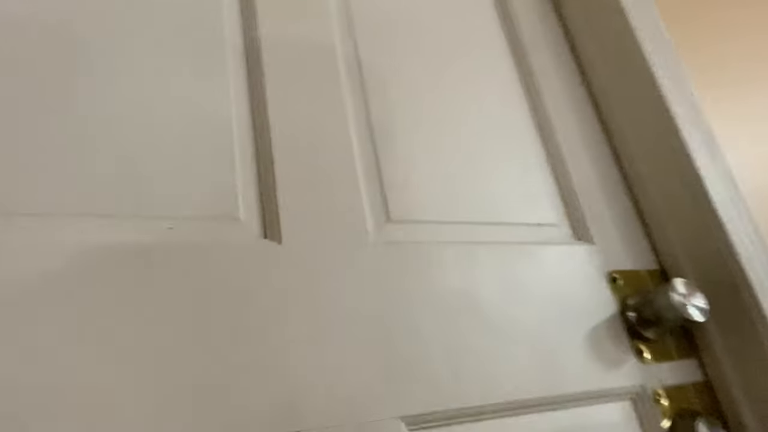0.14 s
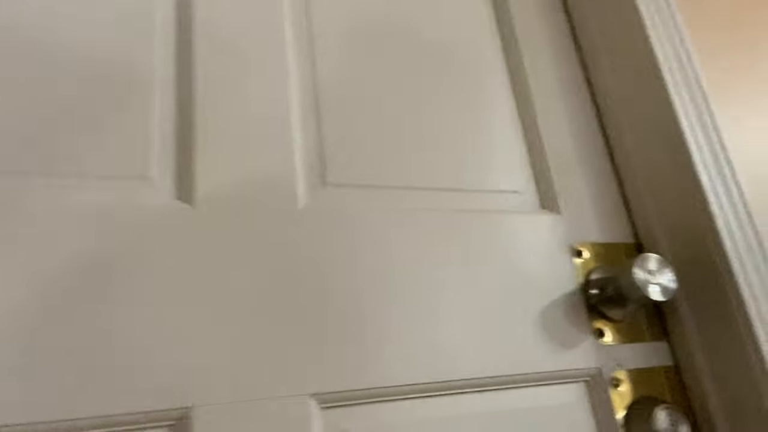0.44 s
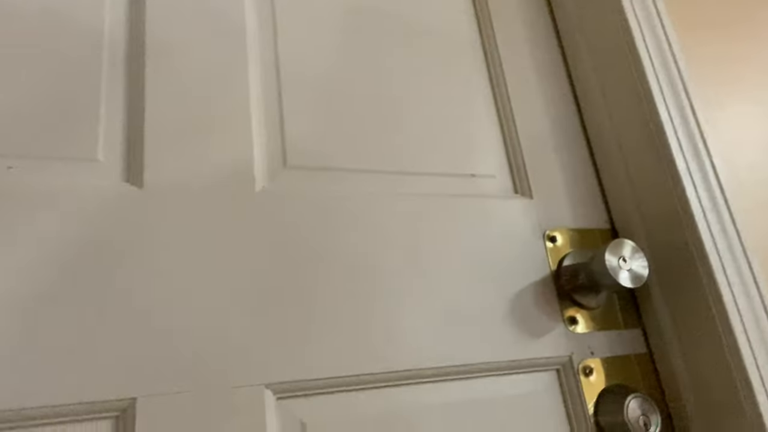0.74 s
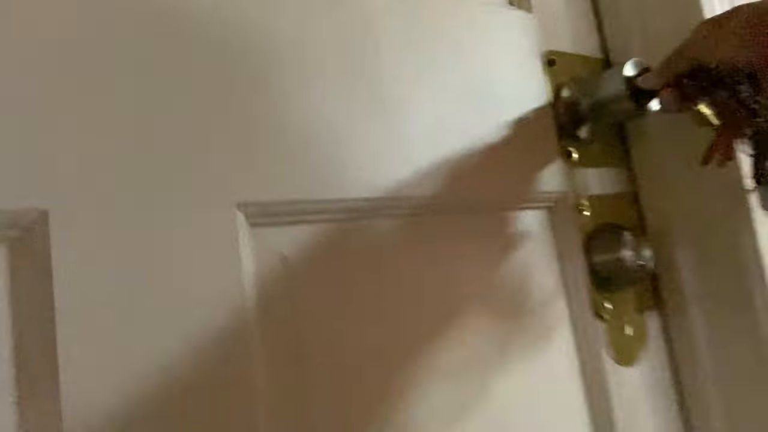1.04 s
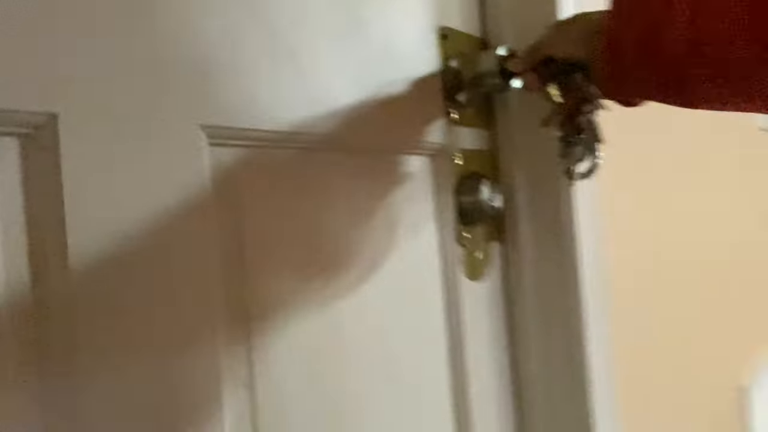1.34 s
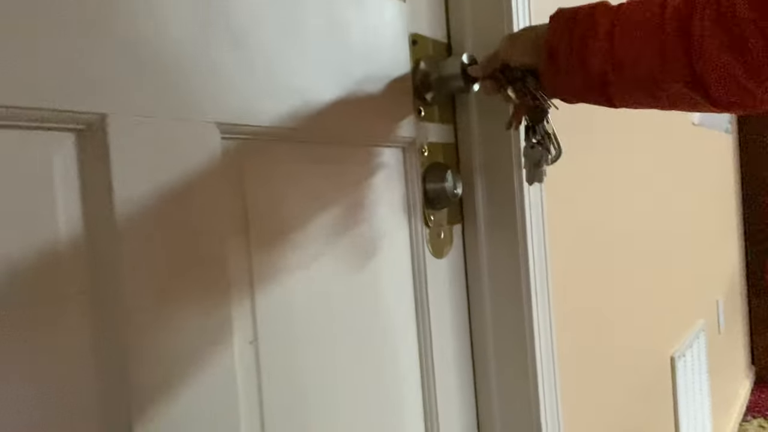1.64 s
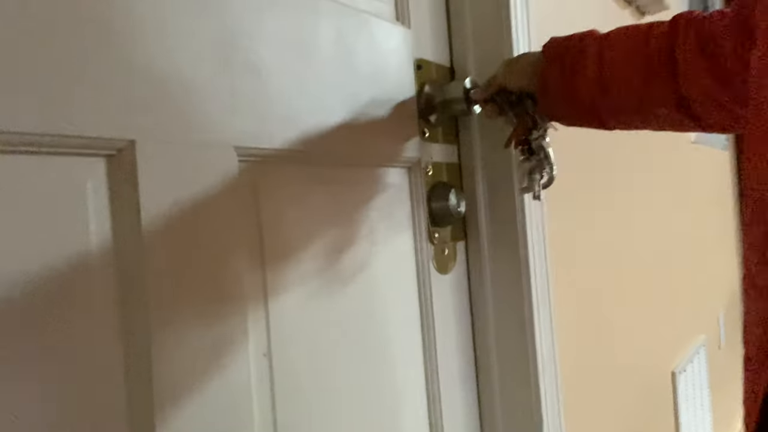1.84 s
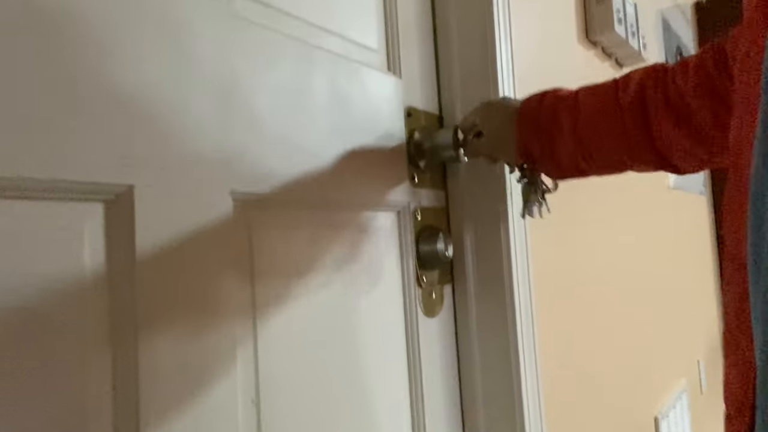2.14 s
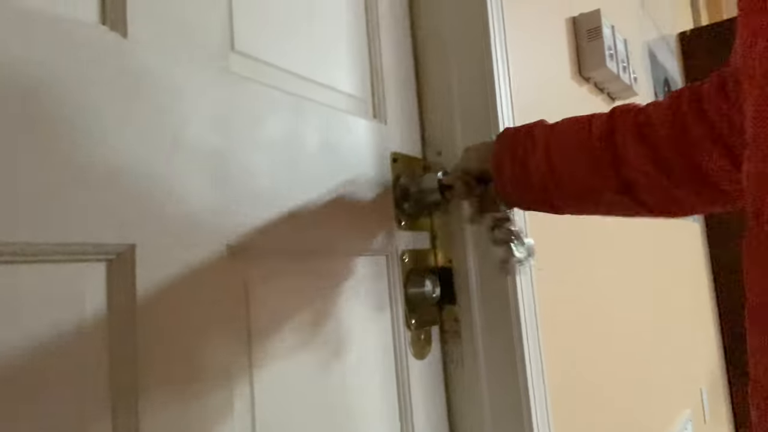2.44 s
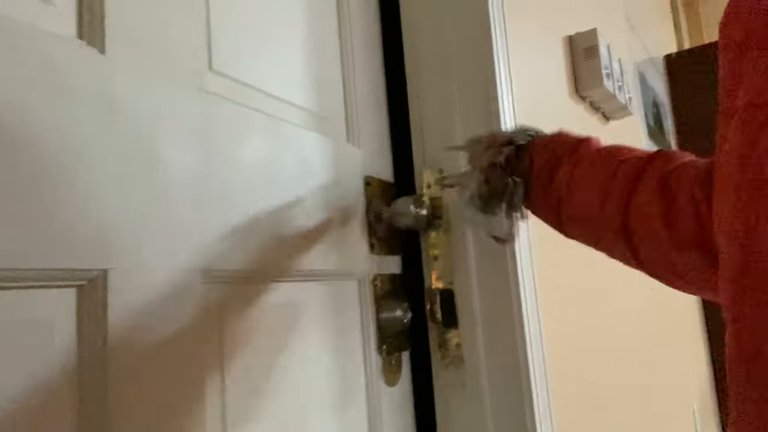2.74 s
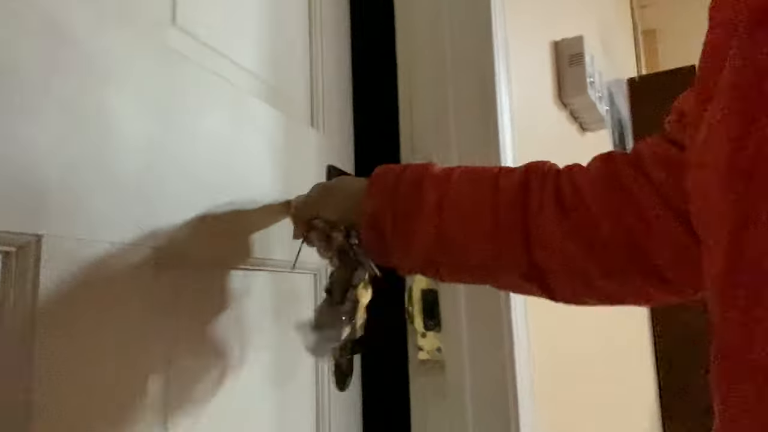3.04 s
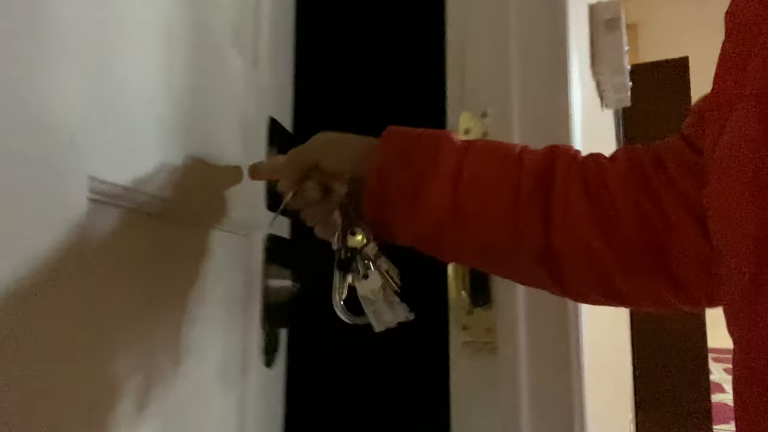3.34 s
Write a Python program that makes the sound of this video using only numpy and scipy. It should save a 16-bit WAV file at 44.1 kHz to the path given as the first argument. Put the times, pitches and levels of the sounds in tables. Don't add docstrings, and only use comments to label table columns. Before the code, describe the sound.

Keys jangle brightly and very close, densest around 0.2-0.5 s, thinning, then clashing sharply near 1.05 s as one meets the lock. A quiet gap with faint rubbing follows until a metallic clack at 1.95 s. A tiny squeak at 2.2 s leads to rapid clacks, loudest around 2.6 s with woody thuds. Keys jingle again from 2.8 to 3.3 s over low hallway hum.

```python
import sys
import numpy as np
from scipy import signal
from scipy.fft import rfft, irfft, next_fast_len
from scipy.io import wavfile
from scipy.ndimage import map_coordinates

SR = 44100
rng = np.random.default_rng(int(sys.argv[2]) if len(sys.argv) > 2 else 0)


def transcribe(u):
    v = np.clip(np.atleast_2d(u).T, -1, 1)
    q = np.round(v * 32767).astype(np.int16)
    wavfile.write(sys.argv[1], SR, q)


def rack_gain(trim_db):
    fader = np.asarray(trim_db, float)
    return 10 ** (fader / 20)


N = 154350
T = np.arange(N) / SR

# start_s, rise_s, fall_of_20_db_s, level_db
BUNCH_RATTLES = [(0, .001, 0.27, -51.5), (.09, .04, 0.9, -52.5), (.175, 0.0034, 0.2, -38.5),
                 (0.206, 0.0045, 0.036, -24.5), (0.222, 0.045, 0.065, -17.5), (.3, 0.035, 0.09, -35),
                 (.368, .01, 0.15, -30), (.464, 0.0097, 0.04, -25.5), (.528, 0.0024, 0.1, -31.5),
                 (0.606, 0.0074, 0.1041, -32), (.712, 0.0037, 0.08, -47.5), (.848, 0.046, 0.0624, -32),
                 (.917, 0.0065, 0.0963, -32), (0.974, 0.014, 0.0578, -24.5), (1.039, 0.008, 0.0339, -14.5),
                 (1.07, 0.0093, 0.15, -41.5), (1.25, 0.0034, 0.12, -60), (1.406, 0.035, 0.0353, -42),
                 (1.936, 0.0012, 0.1, -44.5), (2.044, 0.0013, 0.21, -45.5), (2.37, 0.016, 0.2, -33),
                 (2.66, 0.0051, 0.13, -28.5), (2.768, 0.049, 0.06, -33.5), (2.858, .003, .095, -25),
                 (2.967, 0.0043, 0.03, -40.5), (3.005, 0.0047, 0.05, -29.5), (3.071, .003, 0.022, -25.5),
                 (3.098, 0.013, 0.04, -34), (3.194, 0.0017, 0.06, -27.5), (3.338, 0.0018, 0.06, -40.5)]
# start_s, peak_db, pitch_hz
KEY_CLINKS = [(0.176, -27.5, 6300), (0.192, -17, 6630), (0.2107, -11.5, 7860), (0.2338, -10, 7400),
              (0.2638, -5, 7550), (0.2844, -7, 7560), (0.3705, -17.5, 8060), (0.4266, -18, 8170),
              (0.4401, -17.5, 8150), (0.4667, -14.5, 8140), (0.4748, -13.5, 8100), (0.5297, -18.5, 6730),
              (0.6115, -22, 7000), (0.6294, -26, 8000), (0.7151, -30, 8160), (0.852, -31, 8130),
              (0.8736, -23.5, 7930), (0.8929, -23, 7500), (0.9203, -20.5, 6470), (0.9766, -19, 5980),
              (0.9863, -16, 6900), (1.0014, -19, 7020), (1.0544, -3.5, 7470), (1.4247, -29.5, 6950),
              (1.5029, -33, 6730), (1.7988, -54, 7070), (1.8394, -56, 6490), (1.8711, -47.5, 6960),
              (2.374, -21, 7400), (2.4019, -17, 6200), (2.5506, -37.5, 7100), (2.7738, -27, 6690),
              (2.7911, -25.5, 8410), (2.8137, -24, 8200), (2.8589, -13.5, 7400), (2.8652, -15, 7110),
              (2.8737, -5.5, 7080), (2.893, -15, 7570), (2.9091, -18, 6750), (2.9185, -21.5, 7750),
              (2.9677, -26, 8160), (3.0071, -19, 8200), (3.023, -13, 7750), (3.038, -11, 7800),
              (3.05, -17, 8000), (3.0738, -12.5, 7530), (3.1067, -24, 7040), (3.1134, -22, 7400),
              (3.1363, -26, 7000), (3.1957, -9, 7230), (3.2016, -10, 7660), (3.2089, -9.5, 7510),
              (3.2193, -19, 7750), (3.2359, -16, 7880), (3.2484, -19, 7270), (3.264, -30, 7500),
              (3.3015, -25, 8310), (3.3386, -21.5, 8290), (3.4258, -29, 7300), (3.4964, -25.5, 7480)]
# start_s, pitch_hz, level_db, t60_s
KEY_RINGS = [
    (0, 4090, -57.5, 0.79),
    (0, 8180, -39, 0.12),
    (0.177, 10550, -32.5, 0.58),
    (.37, 8050, -31.5, 0.68),
    (.475, 6800, -38, 0.38),
    (.53, 11070, -31, 0.38),
    (.977, 2435, -31, 0.12),
    (2.939, 8210, -47, 0.48),
]
# freq_hz, level_db
KEY_CRACK = [(900, -46), (2600, -15.5), (5200, -11.5), (7700, -4.5), (12600, -4), (13600, -15),
             (15500, -13.5)]
# start_s, peak_db, door_thud_over_it_db, struck_part_pitch_hz
LOCK_BLOWS = [(.861, -29, -5, 1380), (.871, -24.5, 3, 397), (.985, -31.5, 5, 393), (1.049, -13, -18.5, 880),
              (1.053, -12.5, -16.5, 546), (1.69, -45.5, 3, 780), (1.939, -11.5, -9, 710),
              (2.048, -24.5, -18, 1200), (2.128, -34, -6.5, 2700), (2.302, -37, -21, 4140),
              (2.319, -33, -7, 2650), (2.351, -12.5, -21.5, 1104), (2.397, -15, -7, 3180),
              (2.423, -14, -14, 1650), (2.469, -20, -6, 910), (2.486, -13, -12, 1970),
              (2.578, -25.5, -7, 980), (2.587, -2, -12, 959), (2.59, -8.5, 0.7, 667),
              (2.635, -8.5, -12, 1140), (2.64, -10, 0.8, 410), (2.662, -5, -5.2, 658),
              (3.007, -22, -1, 870)]
# freq_hz, level_db, t60_s
LOCK_MODES = [(396, -4, 0.13), (550, -5.5, 0.096), (646.4, -3, 0.057), (799, 0, 0.054), (967, -2, 0.057),
              (1169, -3.5, 0.049), (1591, -8.5, 0.089), (1921, -4, 0.049), (2098, 1.5, 0.025)]
# freq_hz, level_db, t60_s
DOOR_MODES = [(74.3, -1, .2), (125.6, -1, 0.15), (158.4, 0.5, 0.25), (235.5, -1.5, 0.098),
              (401.8, -4.5, 0.12)]
# freq_hz, level_db
LOCK_SNAP = [(300, -10), (850, 0.5), (2200, -0.5), (4500, -11), (12000, -21), (15600, -24)]
# time_s, level_db
LOCK_SLIDES = [
    [(.84, -54), (.87, -43.5), (.95, -52.5), (1.0, -38), (1.2, -51.5)],
    [(2.29, -59), (2.35, -37), (2.39, -35), (2.43, -23), (2.46, -37.5), (2.49, -32.5), (2.57, -50)],
    [(2.59, -32), (2.68, -31), (2.76, -46.5), (2.93, -46), (2.95, -70)],
]
# time_s, pitch_hz, level_db
PLUG_SQUEAK = [
    (2.15, 703, -74),
    (2.2, 696, -60.5),
    (2.252, 696, -70),
]
# multiple, level_db
SQUEAK_HARMONICS = [(1, 3), (2, 3.5), (3, 1)]
# start_s, length_s, from_hz, to_hz, level_db
HAND_RUBS = [
    (.67, .1, 521, 450, -48),
    (.7, .13, 438, 369, -51),
    (.76, .08, 300, 340, -53),
    (1.137, 0.054, 661, 600, -51),
    (1.292, 0.17, 624, 702, -54),
]
# freq_hz, t60_s
HALL_DECAY = [(200, 0.29), (3000, .22), (10000, 0.14)]
# freq_hz, lead_half_turns
LEAD_HAND = [(0, 0), (2500, 0), (4000, 1), (6200, 3), (9400, 5), (12200, 6), (17600, 8)]
# freq_hz, lead_half_turns
LEAD_LOCK = [(0, 0), (3000, -1), (4200, -.8), (6300, 0), (9500, 1), (12200, 2), (17600, 4)]
# freq_hz, difference_db
TILT_HAND = [(1000, -1.5), (8000, -4.5), (9500, -0.5)]
# freq_hz, difference_db
TILT_LOCK = [(200, -0.5), (350, -2.5), (800, 2), (4000, 3), (9500, -0.5)]
# freq_hz, likeness_0_to_1
PORT_LIKENESS = [(150, 0.92), (400, 0.71), (1500, 0.52), (5000, 0.51), (7500, 0.85), (9200, 0.99)]
# time_s, level_db
HUM_LEVEL = [(0, -39.5), (.5, -48.5), (.95, -39.5), (1.6, -41), (2.5, -36.5), (3.1, -40.5), (3.5, -36.5)]
# freq_hz, level_db
HUM_COLOUR = [(22, -31), (41, -5), (65, 2.5), (130, -2.5), (200, -9), (320, -24.5)]
# time_s, level_db
STIR_LEVEL = [(0, -59), (.55, -70), (.72, -50.5), (.84, -52), (1.3, -47.5), (1.55, -57), (1.69, -54),
              (1.85, -61), (2.1, -51.5), (2.75, -53), (3.1, -57), (3.5, -53)]
# freq_hz, level_db
STIR_COLOUR = [(200, -1.5), (420, -0.5), (1300, -12.5), (3000, -17), (12000, -33.5)]
# freq_hz, level_db
HISS_COLOUR = [(1200, 0), (3000, 6.5), (6000, -15), (12000, -29.5)]

KEY_LOW_HZ, KEY_HIGH_HZ, KEY_T60_S = 2299.6, 14510, 0.03
KEY_CONTACTS_PER_S, KEY_SPREAD_DB, KEY_CRACK_S = 1400, 3.2, 0.005
KEY_RING_DB, CLINK_DB, CLINK_NOTE_DB, CLINK_NOTE_T60_S = -10.5, 0, -10.5, 0.045
BLOW_SNAP_S, BLOW_DB, DOOR_RISE_S = 0.028, -6, 0.008
BLOW_NOTE_DB, BLOW_NOTE_CYCLES = -2.5, 25
SLIPS_PER_S, SLIDE_DB, SLIDE_DOOR_DB = 500, -1.5, -22
HALL_DB, HISS_DB = -15.5, -71
TO_LOCK_S = 0.842
DIP_WIDTH_S, DIP_DB = 0.008, -11
TOP_HZ = 16100


def unit(x):
    return x / np.sqrt(np.mean(x ** 2) + 1e-20)


def along(points, hz):
    f, v = np.transpose(points)
    return np.interp(np.log(hz + 1), np.log(f + 1), v)


def level(*tables):
    return sum(rack_gain(np.interp(T, *np.transpose(rows), left=-200, right=-200)) for rows in tables)


def wobble(rate):
    knots = rng.standard_normal(int(N * rate / SR) + 4)
    return map_coordinates(knots, [T * rate])


def filtered(x, response):
    m = next_fast_len(x.shape[-1] + 8192)
    spectrum = rfft(x, m) * response(np.fft.rfftfreq(m, 1 / SR))
    return irfft(spectrum, m)[..., :x.shape[-1]]


def colour(x, points):
    closed = [(points[0][0] / 2, -90), *points, (points[-1][0] * 1.1, -90)]
    return filtered(x, lambda hz: rack_gain(along(closed, hz)))


def add(track, s, sound):
    track[round(s * SR):][:len(sound)] += sound


def ring(modes, scatter_db, rise_s=0.0012):
    t = T[:SR // 8]
    hz, db, t60 = np.transpose(modes)[..., None]
    chance = rng.standard_normal((len(hz), 2))
    decay = rack_gain(db + scatter_db * chance[:, :1] - 60 * t / t60)
    waves = decay * np.sin(2 * np.pi * hz * (1 + 0.015 * chance[:, 1:]) * t)
    return waves.sum(0) * (1 - np.exp(-t / rise_s)) * np.sqrt(1 - t / t[-1])


def puff(t60, points, rise_s):
    t = T[:SR // 8]
    noise = unit(colour(rng.standard_normal(len(t)), points))
    return noise * rack_gain(-60 * t / t60) * np.minimum(t / rise_s, 1)


def contacts(rate, spread_db, gain, strike, count):
    happens = rng.random((count, N)) < rate / SR / count
    hits = happens * rack_gain(spread_db * np.minimum(rng.exponential(size=(count, N)), 2.5))
    bodies = np.array([strike() for _ in range(count)])
    size = np.sqrt(np.mean(hits ** 2, 1) @ np.sum(bodies ** 2, 1))
    return signal.fftconvolve(hits * gain, bodies, axes=1).sum(0)[:N] / size


def keys():
    out = np.zeros(N + SR)
    shake = np.zeros(N)
    for s, rise, fall, db in BUNCH_RATTLES:
        swell = np.clip((T - s) / rise, 0, 1) ** 0.69
        fallen = (np.clip(T - s - rise, 0, None) / fall) ** 1.34
        shake += swell * rack_gain(db - 20 * fallen)
    for s, db, hz in KEY_CLINKS:
        strike = key_strike()
        note = rack_gain(CLINK_NOTE_DB) * ring([(hz, 0, CLINK_NOTE_T60_S)], scatter_db=2, rise_s=0.00044)
        add(out, s, rack_gain(db + CLINK_DB) * (strike / np.abs(strike).max() + note))
    t = T[:SR]
    for s, hz, db, t60 in KEY_RINGS:
        decay = rack_gain(db - 60 * t / t60 + 5.1 * wobble(60)[:SR])
        add(out, s, decay * np.sin(2 * np.pi * hz * t))
    shake = shake * rack_gain(1.3 * wobble(80))
    return out[:N] + contacts(KEY_CONTACTS_PER_S, KEY_SPREAD_DB, shake, key_strike, count=17)


def key_strike():
    place, life = rng.random((2, 5))
    hz = KEY_LOW_HZ * (KEY_HIGH_HZ / KEY_LOW_HZ) ** np.sqrt(place)
    t60 = KEY_T60_S * (0.28 + 2 * life ** 2)
    modes = np.transpose([hz, along(KEY_CRACK, hz), t60])
    return puff(KEY_CRACK_S, KEY_CRACK, rise_s=0.0004) + rack_gain(KEY_RING_DB) * ring(modes, scatter_db=5)


def lock():
    slides = contacts(SLIPS_PER_S, 3.7, level(*LOCK_SLIDES), lock_slip, count=9)
    return lock_blows() + rack_gain(SLIDE_DB) * slides + plug_squeak()


def lock_blows():
    out = np.zeros(N + SR)
    for s, db, thud_db, hz in LOCK_BLOWS:
        metal = 0.35 * ring(LOCK_MODES, scatter_db=5.0)
        metal += ring([(hz, BLOW_NOTE_DB, BLOW_NOTE_CYCLES / hz)], scatter_db=1.0)
        metal += puff(BLOW_SNAP_S, LOCK_SNAP, rise_s=0.0017)
        thud = rack_gain(thud_db) * ring(DOOR_MODES, scatter_db=2.0, rise_s=DOOR_RISE_S)
        add(out, s, rack_gain(db + BLOW_DB) * (metal + thud))
    return out[:N]


def lock_slip():
    metal = 0.075 * ring(LOCK_MODES, scatter_db=5) + puff(0.008, LOCK_SNAP, rise_s=0.001)
    return metal + rack_gain(SLIDE_DOOR_DB) * ring(DOOR_MODES, scatter_db=1.0, rise_s=0.0046)


def plug_squeak():
    s, hz, db = np.transpose(PLUG_SQUEAK)
    phase = 2 * np.pi * np.cumsum(np.interp(T, s, hz) * (1 + 0.012 * wobble(65))) / SR
    tones = sum(rack_gain(g + 3.0 * wobble(37.1)) * np.sin(k * phase) for k, g in SQUEAK_HARMONICS)
    return level(np.transpose([s, db])) * tones


def rubs():
    out = np.zeros(N + SR)
    for s, length, from_hz, to_hz, db in HAND_RUBS:
        u = np.linspace(0, 1, round(length * SR))
        hz = (from_hz + (to_hz - from_hz) * u) * (1 + 0.04 * wobble(60)[:len(u)])
        swell = rack_gain(db + 4.7 * wobble(45)[:len(u)]) * np.sin(np.pi * u)
        add(out, s, swell * np.sin(2 * np.pi * np.cumsum(hz) / SR))
    return out[:N]


def hall(x, t60s, fresh_s=0.35, length_s=0.33):
    out, step = np.zeros(N + SR), round(fresh_s * SR)
    for at in range(0, N, step):
        hz, t, z = signal.stft(rng.standard_normal(round(length_s * SR)), SR, nperseg=256)
        decay = rack_gain(-60 * t / along(t60s, hz)[:, None])
        tail = signal.istft(z * decay, SR, nperseg=256)[1]
        add(out, at / SR, signal.fftconvolve(x[at:at + step], tail / np.linalg.norm(tail)))
    return out[:N]


def ports(a, b, lead, tilt):
    def blend(hz):
        return np.arccos(np.clip(along(PORT_LIKENESS, hz), -1, 1)) / 2

    def side(sign):
        def path(hz):
            half_turns = np.interp(hz, *np.transpose(lead))
            return rack_gain(sign * along(tilt, hz) / 2) * np.exp(-0.5j * np.pi * sign * half_turns)

        shared = filtered(a, lambda hz: path(hz) * np.cos(blend(hz)))
        return shared + sign * filtered(b, lambda hz: path(hz) * np.sin(blend(hz)))

    return np.array([side(1.0), side(-1.048)])


def background():
    def noise(points):
        return unit(colour(rng.standard_normal((2, N)), points))

    hum = level(HUM_LEVEL) * rack_gain(1.0 * wobble(12)) * noise(HUM_COLOUR)
    stir = level(STIR_LEVEL) * rack_gain(2 * wobble(20) + 1.8 * wobble(7)) * noise(STIR_COLOUR)
    return hum + stir + rack_gain(HISS_DB) * noise(HISS_COLOUR)


def scene():
    near = keys() + lock() + rubs()
    near = near + rack_gain(HALL_DB) * hall(near, HALL_DECAY)
    close_reflections = hall(near, [(300, 0.046), (8000, 0.014)], fresh_s=0.06, length_s=0.05)
    a, b = np.array([near, close_reflections]) + background()
    early = T < TO_LOCK_S
    at_hand = ports(a * early, b * early, LEAD_HAND, TILT_HAND)
    at_lock = ports(a * ~early, b * ~early, LEAD_LOCK, TILT_LOCK)
    return at_hand + at_lock


def top_cut(x):
    return signal.sosfilt(signal.butter(12, 16120, fs=SR, output="sos"), x)


def record(dry):
    dip = rack_gain(DIP_DB * np.exp(-((T - TO_LOCK_S) / DIP_WIDTH_S) ** 2))
    mix = filtered(dry * dip, lambda hz: hz < TOP_HZ)
    return top_cut(mix)


dry = scene()
out = record(dry)
transcribe(out)
```